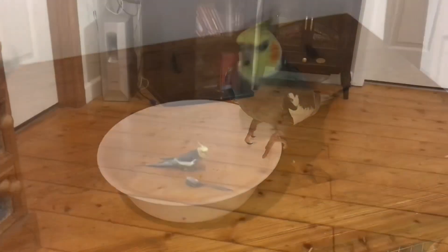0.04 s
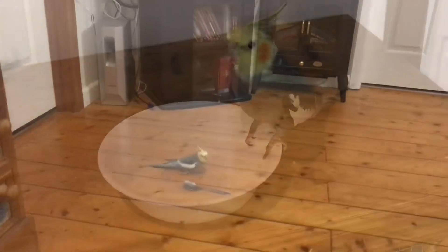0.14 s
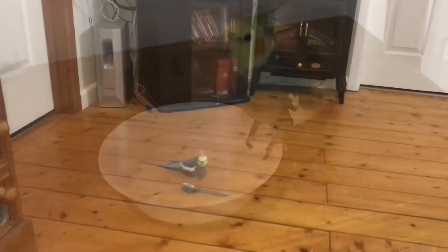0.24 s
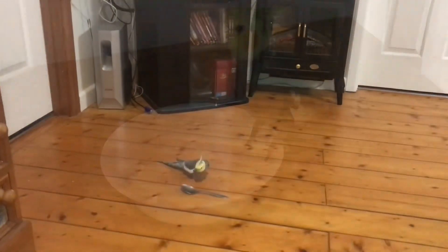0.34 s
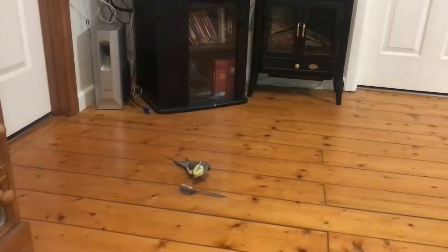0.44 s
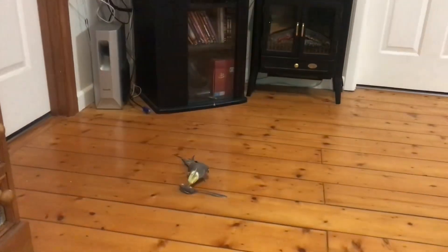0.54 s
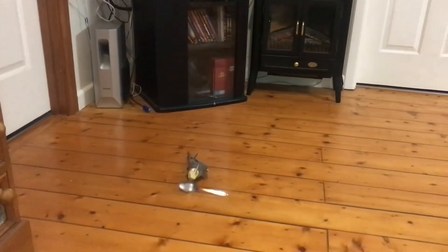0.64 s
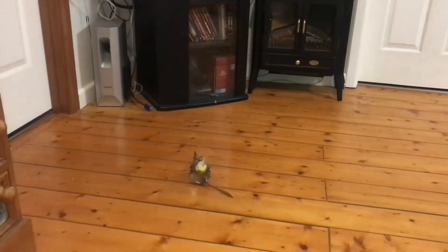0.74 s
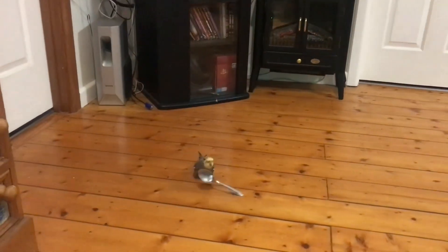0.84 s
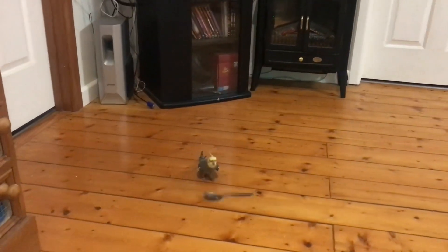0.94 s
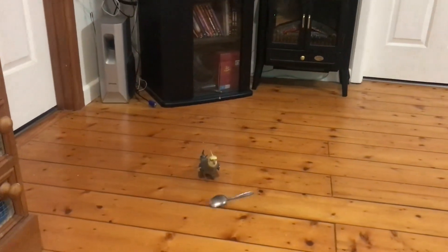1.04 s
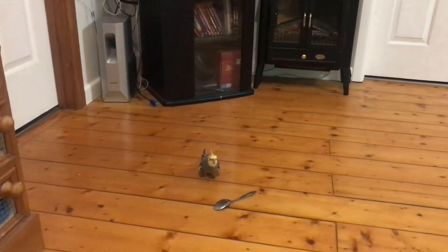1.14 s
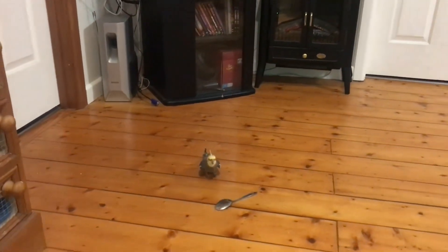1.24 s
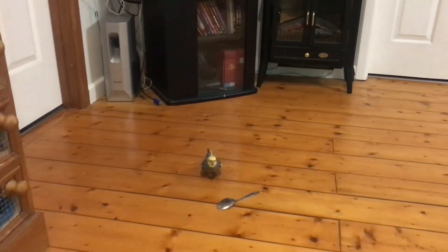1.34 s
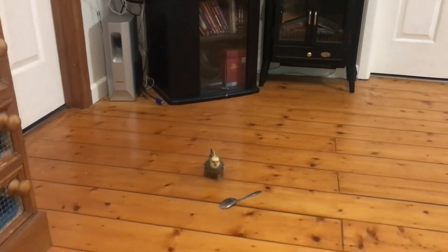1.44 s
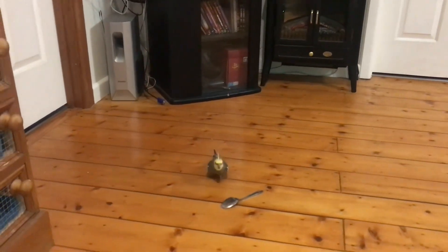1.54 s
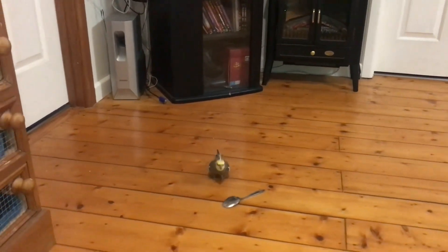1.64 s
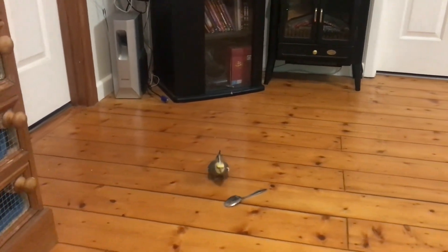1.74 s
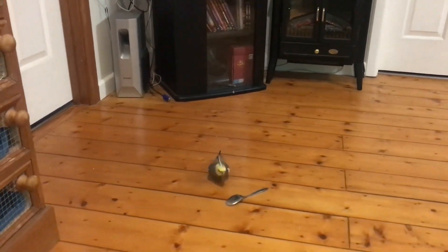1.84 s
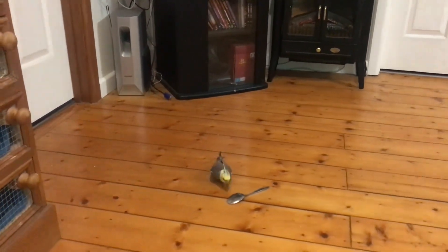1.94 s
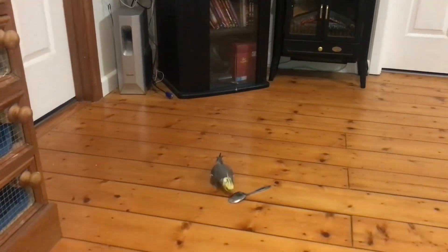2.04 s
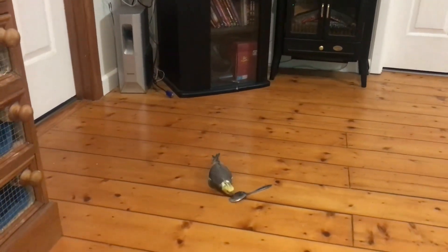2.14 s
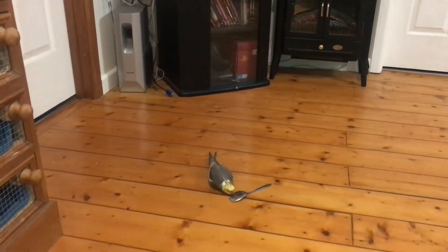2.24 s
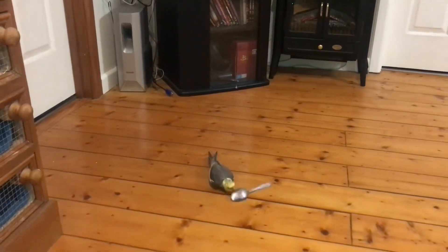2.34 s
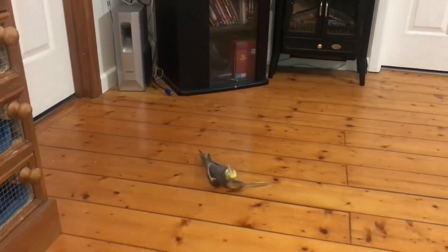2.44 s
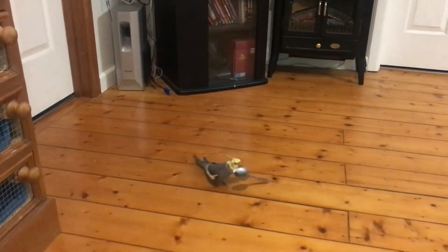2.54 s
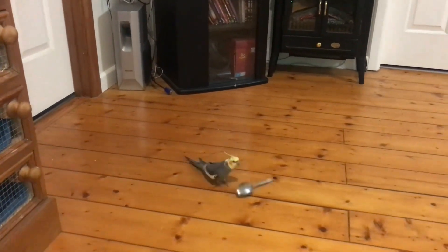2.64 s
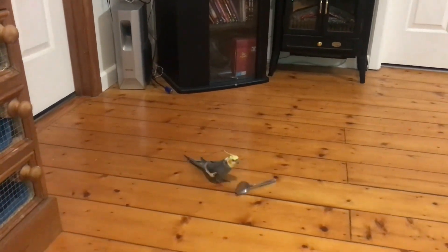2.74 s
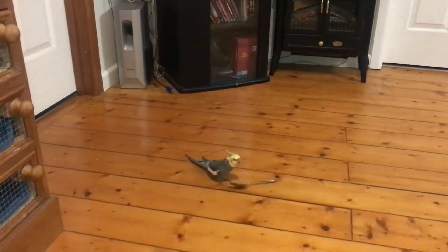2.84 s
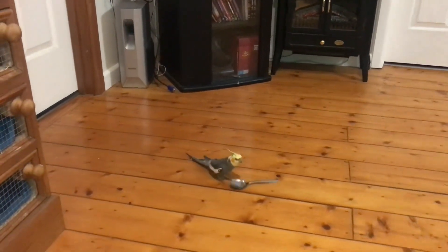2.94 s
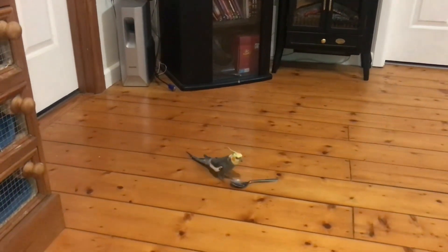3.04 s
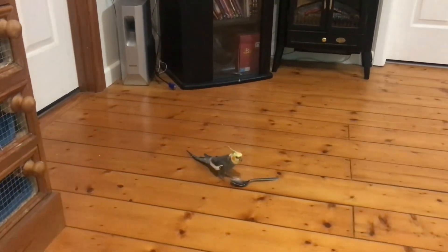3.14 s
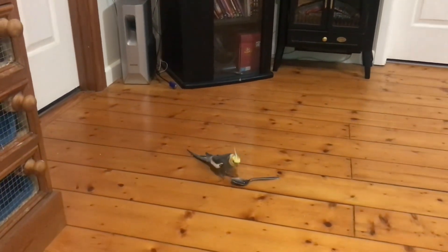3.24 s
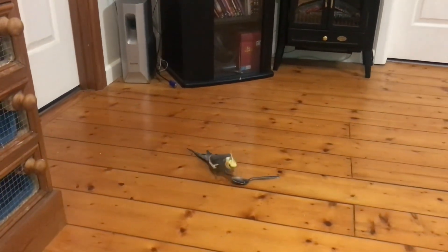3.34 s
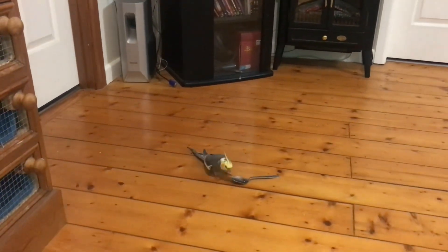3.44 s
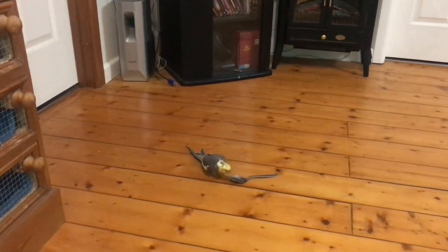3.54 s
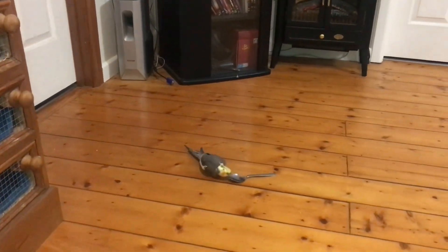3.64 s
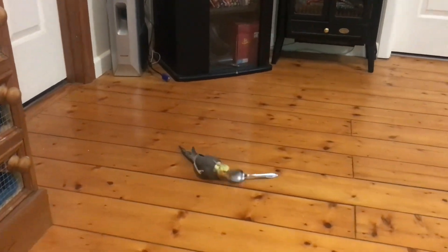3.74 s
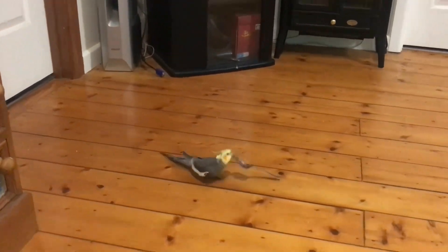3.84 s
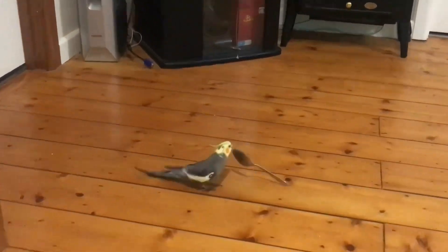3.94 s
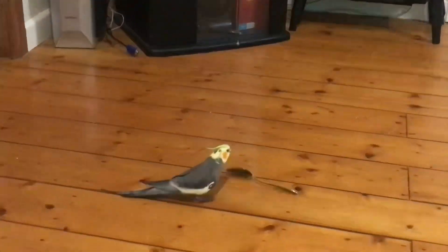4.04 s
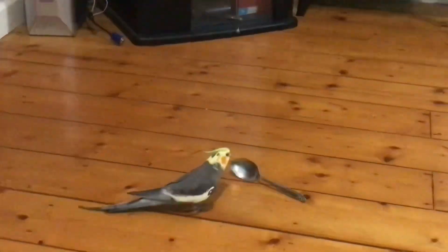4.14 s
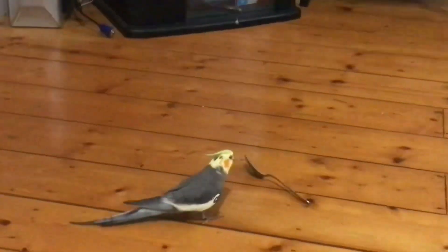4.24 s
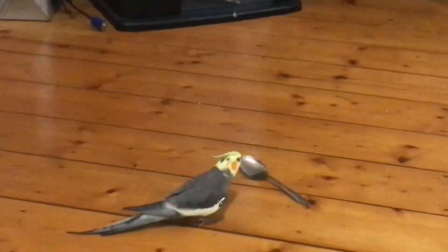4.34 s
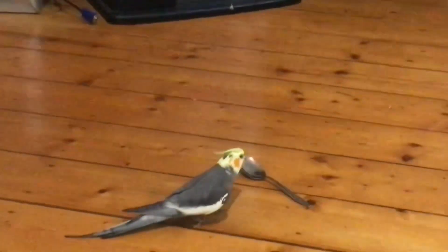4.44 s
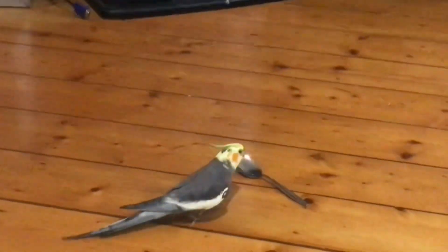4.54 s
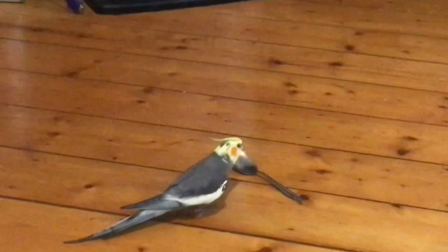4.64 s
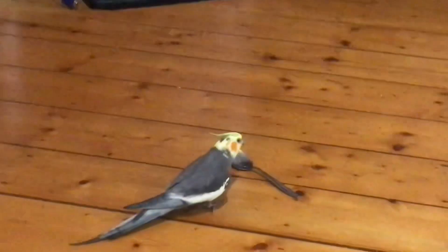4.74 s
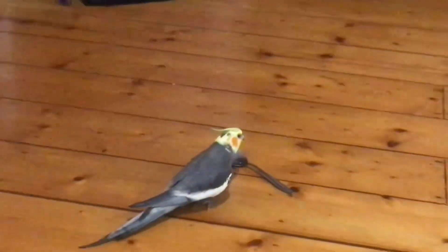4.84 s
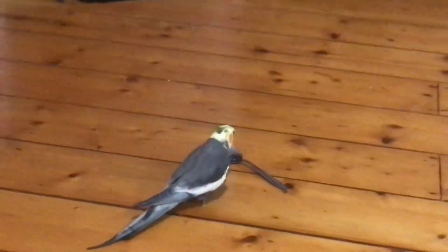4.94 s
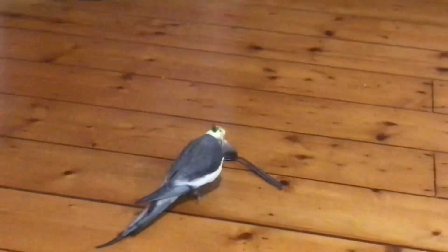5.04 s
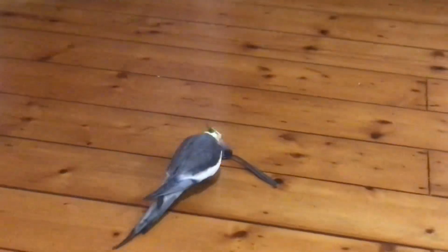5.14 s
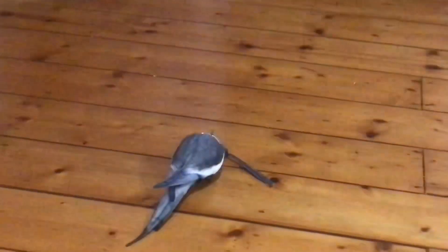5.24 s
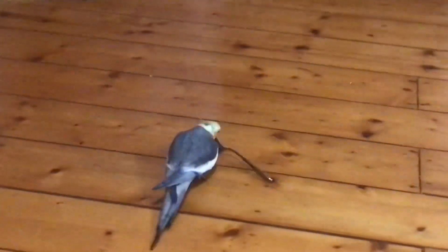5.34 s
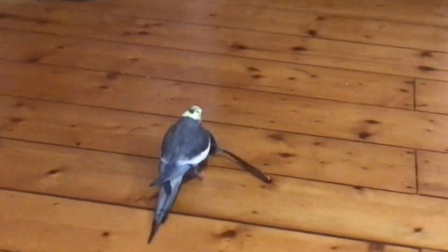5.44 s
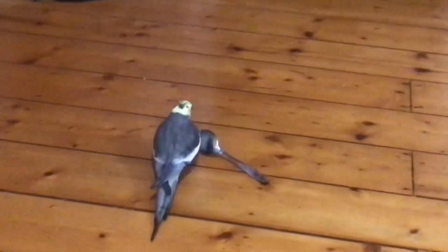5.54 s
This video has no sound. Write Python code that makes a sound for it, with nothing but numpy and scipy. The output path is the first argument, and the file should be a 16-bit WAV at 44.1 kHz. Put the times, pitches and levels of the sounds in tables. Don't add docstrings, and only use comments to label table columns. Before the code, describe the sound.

The tail of a bird whistle opens over faint room rumble. Light pecks lead to a loud spoon clatter on a wood floor, with hollow board thumps and rocking rattle, then a short nearly pure whistled tune. Two more tosses each get the same whistled reply, before small final taps. Live indoor echo, handheld phone a few steps off.

```python
import sys
import numpy as np
from scipy import signal
from scipy.io import wavfile
from scipy.ndimage import uniform_filter1d

SR = 44100
rng = np.random.default_rng(int(sys.argv[2]) if len(sys.argv) > 2 else 0)


def wav_record(signal):
    frames = np.transpose(np.atleast_2d(signal))
    bounded = np.clip(frames, -1, 1)
    quanta = np.round(bounded * 32767).astype(np.int16)
    wavfile.write(sys.argv[1], SR, quanta)


def boost(x):
    u = np.asarray(x, float) / 20
    return 10 ** u


N = 246959
LEAD = SR // 2

# pitch_hz, level_db
HUSH_COLOUR = [(12, -38.5), (20, -18.5), (34, 4.5), (58, 9.5), (81, 1), (123, -6), (142, -21.5), (182, -5),
               (367, -17), (802, -21.5), (1290, -26.5), (2260, -30.5), (2910, -33), (4180, -37),
               (16000, -44.5)]
# peak_s, over_calm_db, rise_s, fall_s
STIRS = [
    (1.17, 37.5, 0.12, 0.29),
    (2.2, 7.5, 0.81, 0.87),
    (2.9, 16.5, .16, 1),
    (4.268, 20.5, 0.47, 0.84),
    (5.46, 15.5, 0.39, 0.12),
]
# pitch_hz, t60_s (time to fade by 60 dB)
ROOM_FADE = [(100, 0.42), (400, 0.77), (1500, 0.74), (3000, 0.57), (6000, 0.55), (14000, 0.11)]
# delay_s, level_db
ECHOES = [(.0045, -11), (.0085, -5), (.012, -13.5), (.017, -9.5), (.022, -12), (.028, -7.5)]

# pitch_hz, level_db, t60_s
BOARD_BOOMS = [(67.76, -6, 0.35), (174.7, -3.5, 0.36), (234.7, -16, 0.37), (231, -20, 0.13),
               (302, -7.5, 0.6), (368.7, -18, 1), (440.2, -14.5, 0.2), (824, -13, 0.56), (940, -3.5, 0.3),
               (1020, 2, 0.12), (1120, -23, 0.053)]
# pitch_hz, level_db
WOOD_COLOUR = [(50, -44), (110, -16.5), (295, -3.5), (535, -11), (1030, -2.5), (2270, -14), (3400, -17),
               (5080, -31), (8640, -48.5), (16000, -71)]
BOWL_HZ = [2697, 4177, 5356, 6168, 7100, 8466, 8612, 9700, 10250, 11390, 12120, 12600, 13770, 14910]
# level_db, t60_s
BOWL_RING = [(-5, .2), (-14, .35), (-9, .65), (-13, .6), (-27, .27), (-11, .4), (-14, .3), (-12, .33),
             (-27, .35), (-22, .25), (-21, .3), (-21, .28), (-25, .3), (-26, .24)]
# start_s, blow_db, brightness_db_per_octave, bowl_ring_db, handle_ring_db
BOUNCES = [(0.996, -11.5, -0.1, -45, -33), (1.057, -34, 6, -35, -27), (1.102, -13, 3.5, -42.5, -19.5),
           (1.162, -17, 2.5, -33.5, -32), (1.219, -21, 3, -40, -35), (1.253, -29, 4.5, -23, -14.5),
           (1.273, -27, 6.5, -81.5, -10.5), (2.713, -13, 3, -27, -11), (2.733, -26, -7.2, -36, -10.5),
           (2.788, -21.5, -2.5, -53, -29), (2.85, -19.5, 1.2, -35.5, -23), (4.054, -9.5, -2, -52.5, -34),
           (4.095, -11.5, 1.5, -43, -7.7), (4.162, -25.5, -8, -56.5, -32)]
TOUCHES = [
    (2.974, -31, 1, -38, -2),
    (4.247, -29, 3, -42, -30),
    (4.288, -38, 0, -28, 8),
    (4.344, -36, 0, -45, -10),
    (4.383, -37, -1, -40, 2),
]
# start_s, blow_db, brightness_db_per_octave, boom_db
PECKS = [(0.623, -36.5, -4, -1), (0.668, -28, 0.5, -7), (0.691, -32.5, -7, 0), (1.55, -59.5, 2, -16.5),
         (1.596, -77, -20, -1), (1.75, -60, -7, -4.5), (2.117, -39.5, -5.5, -3), (2.364, -67, -15, -7.5),
         (2.387, -38.5, -3, -4), (3.654, -43.5, -4, 6), (3.676, -32.5, -3, -23), (5.252, -34, -0.7, -3.5),
         (5.299, -40, 5.5, -2.5), (5.43, -26, -7, -3.5)]
# start_s, length_s, level_db, fade_db, ring_db
ROCKING = [
    (0.709, 0.28, -53, -0.5, -42),
    (1.02, 0.034, -40, -27, -38),
    (1.082, 0.3, -30.5, -33.5, -32),
    (2.138, .18, -68, 3.5, -45.5),
    (2.34, 0.6, -56.5, -19, -39.5),
    (2.752, 0.38, -35.5, -1.5, -55.5),
    (4.165, 0.21, -40.5, 0, -27),
    (4.368, 0.25, -35.5, -11.5, -30.5),
    (5.266, 0.097, -52, -21, -34.5),
    (5.452, 0.077, -35, -39.5, -63),
]

# top_s, top_hz, rise_s, sag_hz_per_s, level_db
FALLS = [
    (-.22, 3744, .021, 26300, -31),
    (1.559, 3680, 0.023, 31230, -24.5),
    (3.203, 3644, .027, 25100, -27),
    (4.653, 3827, 0.024, 29500, -26),
]
FALL_SHAPE_DB = [-17.5, -6.5, 2.5, 7.9, 3.5, 6.1, -12]
SIGH_SHAPE_DB = [-12, -12, -21]
# top_s, top_hz, rise_s, fall_s, level_db
ARCHES = [
    (-.03, 1861, 0.04, 0.068, -34),
    (1.76, 1747, 0.086, 0.049, -32),
    (3.394, 1802, 0.075, .058, -31),
    (4.845, 1790, 0.054, 0.047, -32.5),
]
ARCH_SHAPE_DB = [-15.5, -9.5, -10.5, 1.3, -15.5, -20]
OVERTONES_DB = [-30.5, -37.5, -48.5, -50.5]
HALF_LINES_DB = [-5, -15, -33]
# start_s, level_db
CHIRPS = [
    (1.252, -32),
    (2.888, -34),
    (4.32, -38),
]
# time_s, pitch_hz, level_db
CHIRP_SHAPE = [(0, 4700, -9), (.013, 3500, -2), (.022, 3200, 0), (.031, 2800, -9)]
# start_s, length_s, pitch_hz, level_db
LEAD_INS = [
    (1.368, 0.041, 1487, -42),
    (3.027, 0.027, 1564, -37.5),
    (4.471, 0.037, 1540, -44),
]
SECOND_VOICE = [
    (3.183, 0.077, 6000, -51.5),
    (4.628, .052, 6000, -51),
]
# start_s, length_s, pitch_hz, level_db
SQUEAK = (1.745, .06, 12350, -75)
# warble_s, pitch_hz, rasp_db, warble_db
INTAKES = [
    (1.526, 3780, -48.5, -36),
    (3.168, 3844, -53.5, -37.5),
    (4.616, 4114, -44.5, -42.5),
]
# time_s, pitch_ratio, level_db
WARBLE_SHAPE = [(0, .94, -1), (.006, 1.2, 6.2), (.011, 0.56, -2.5), (.017, 1.1, -4.5), (.025, 1.2, -22)]


def evened(x):
    return x / np.sqrt(np.mean(x ** 2) + 1e-20)


def read(points, hz):
    f, value = np.transpose(points)
    return np.interp(np.log(hz + 1), np.log(f + 1), value)


def add(mix, s, sound):
    part = mix[LEAD + round(s * SR):][:len(sound)]
    part += sound[:len(part)]


def hush(hush_db=-54, calm_db=-67.5, usual_db=-66, low_hz=130, high_hz=900, rumble_swell_db=1.5):
    frames, hz = N // 512 + 6, np.fft.rfftfreq(2048, 1 / SR)[:, None]
    a, b = rng.standard_normal((frames, 1025, 2)).T
    swell = evened(uniform_filter1d(rng.standard_normal(frames), 12))
    middle = 1 / (1 + (low_hz / (hz + 1)) ** 4) / (1 + (hz / high_hz) ** 4)
    frame_s = np.arange(frames) * 512 / SR
    busy_db = calm_db - usual_db
    for s, db, rise, drop in STIRS:
        busy_db = busy_db + np.interp(frame_s, [s - rise, s, s + drop], [0, db, 0])
    z = (a + 1j * b) * boost(read(HUSH_COLOUR, hz) + rumble_swell_db * swell * (hz < 400))
    calm = signal.istft(z, nperseg=2048, noverlap=1536)[1][:N]
    busy = signal.istft(z * boost(middle * busy_db), nperseg=2048, noverlap=1536)[1][:N]
    return boost(hush_db) * busy / calm.std()


def room(x, wet_db, echo_db):
    taps = np.zeros(SR)
    at = np.arange(500, SR - 20, 20)
    taps[at + rng.integers(0, 20, len(at))] = rng.choice([-1., 1.], len(at))
    hz, t, z = signal.stft(taps, SR, nperseg=256)
    tail = signal.istft(z * boost(-60 * t / read(ROOM_FADE, hz)[:, None]), SR, nperseg=256)[1]
    tail *= np.clip((np.arange(len(tail)) - 400) / 900, 0, 1)
    tail *= boost(wet_db) / np.linalg.norm(tail)
    tail[0] = 1
    for k, (delay, db) in enumerate(ECHOES):
        tail[round(delay * SR)] += (-1) ** k * boost(db + echo_db)
    return signal.fftconvolve(x, tail)[LEAD:LEAD + N]


def causal(db):
    log_gain = np.log(boost(np.concatenate([db, db[-2:0:-1]])))
    pulse = np.fft.ifft(np.exp(np.conj(signal.hilbert(log_gain)))).real[:1024]
    return pulse / abs(pulse).max()


def ring(blows, hz, t60):
    r = 10 ** (-3 / (t60 * SR))
    turn = 2 * np.pi * hz / SR
    return signal.lfilter([np.sin(turn)], [1, -2 * r * np.cos(turn), r * r], blows)


def all_blows(boom_db=10.5, boom_per_blow_db=1.45, peck_ring_db=-54, peck_handle_db=-34.5):
    blows = []
    for s, db, bright_db, bowl_db, handle_db in [*BOUNCES, *TOUCHES]:
        blows.append((s, db, bright_db, bowl_db, boom_db + boom_per_blow_db * db, handle_db))
    for s, db, bright_db, low_db in PECKS:
        blows.append((s, db, bright_db, peck_ring_db, low_db, peck_handle_db))
    return sorted(blows)


def steel(hold, luck, bowl_db, handle_db, damped_db=-8, spread_db=-2.5, handle_hz=3340, handle_t60=0.4):
    t = np.arange(SR // 2) / SR
    db, t60 = np.transpose(BOWL_RING)[:, :, None]
    db = db + bowl_db + spread_db * np.clip(luck[:len(BOWL_RING), None], -1.5, 1.5)
    tones = (boost(db - 60 * t / t60) * np.sin(2 * np.pi * np.outer(BOWL_HZ, t))).sum(0)
    tones += boost(handle_db - 60 * t / handle_t60) * np.sin(2 * np.pi * handle_hz * t)
    return tones * boost(damped_db * np.clip((t - hold) / .004, 0, 1))


def rocking(per_s=260, spread_db=6.5, rock_db=-6.5, ring_db=3, ring_fade_db=-5):
    rock, jingle = np.zeros((2, N + LEAD))
    patter = boost(spread_db * np.minimum(rng.exponential(1, N), 2.6)) * rng.choice([-1, 1], N)
    patter *= rng.random(N) < per_s / SR
    for start, length, level_db, fade_db, sing_db in ROCKING:
        s = np.array([start, start + length])
        db = np.array([level_db, level_db + fade_db])
        metal_db = np.array([sing_db, sing_db + ring_fade_db])
        metal_db = metal_db + np.minimum(db + 55, 0)
        at = np.arange(round(start * SR), min(round(s[-1] * SR), N))
        taps = patter[at] * boost(np.interp(at / SR, s, db) + rock_db)
        add(rock, start, taps)
        add(jingle, start, taps * boost(np.interp(at / SR, s, metal_db) + ring_db))
    return rock, jingle


def spoon_and_floor(rock_boom_db=-14, ring_db=8, handle_db=-14, boom_db=-8, chatter_s=0.0065):
    wood, metal, boom = np.zeros((3, N + LEAD))
    hz = np.fft.rfftfreq(2048, 1 / SR)
    octaves = np.log2(np.minimum(hz, 7000) / 1000 + 0.19)
    blows = all_blows()
    holds = np.diff([row[0] for row in blows], append=N)
    chance = rng.standard_normal((len(blows), 1024))
    for (s, db, bright_db, metal_db, low_db, stem_db), hold, luck in zip(blows, holds, chance):
        chatter = luck * abs(luck) * np.exp(-np.arange(len(luck)) / (chatter_s * SR))
        chatter[0] = 2.6
        knock = np.convolve(chatter, causal(read(WOOD_COLOUR, hz) + bright_db * octaves))
        add(wood, s, boost(db) * knock / abs(knock).max())
        add(metal, s, boost(db) * steel(hold, luck, metal_db + ring_db, stem_db + handle_db))
        add(boom, s, boost([db + low_db + boom_db]))
    rock, jingle = rocking()
    wood += signal.oaconvolve(rock, causal(read(WOOD_COLOUR, hz)))[:len(wood)]
    for f, (db, t60) in zip(BOWL_HZ, BOWL_RING):
        metal += ring(boost(db) * jingle, f, t60 / 2)
    thumps = boom + boost(rock_boom_db) * rock
    boards = sum(boost(db) * ring(thumps, f, t60) for f, db, t60 in BOARD_BOOMS)
    return wood, metal, boards


def fall(top, hz, rise, sag, db, from_hz=3250, break_hz=2225, sag_bend=1.15):
    down = np.arange(5) / 4 * (hz - break_hz) / sag
    s = np.concatenate([[top - rise, top - rise / 2], top + down])
    sagging = hz - (hz - break_hz) * (down / down[-1]) ** sag_bend
    pitch = np.concatenate([[from_hz, hz - (hz - from_hz) / 4], sagging])
    return np.transpose([s, pitch, db + np.array(FALL_SHAPE_DB)])


def sigh(top, hz, rise, sag, db, break_hz=2225, end_hz=1652, length_s=0.021):
    steps = np.arange(3) / 2
    start = top + (hz - break_hz) / sag
    pitch = break_hz + (end_hz - break_hz) * steps
    return np.transpose([start + length_s * steps, pitch, db + np.array(SIGH_SHAPE_DB)])


def arch(top, hz, rise, drop, db, from_hz=1170, to_hz=994, hold_s=0.045):
    held = top + hold_s
    s = [top - rise, top - rise / 2, top, held, held + drop / 2, held + drop]
    pitch = [from_hz, (from_hz + hz) / 2, hz, hz, (to_hz + hz) / 2, to_hz]
    return np.transpose([s, pitch, db + np.array(ARCH_SHAPE_DB)])


def note(start, length, hz, db, scoop=0.064, ends_db=2):
    return [(start, hz * (1 - scoop), db + ends_db), (start + length / 2, hz, db),
            (start + length, hz, db + ends_db)]


def rasp(s, hz, rasp_db, warble_db, length_s=0.034, scoop=0.13, start_db=-19):
    return [(s - length_s, hz * (1 - scoop), rasp_db + start_db), (s - length_s / 2, hz, rasp_db), (s, hz, rasp_db)]


def warble(s, hz, rasp_db, warble_db):
    return np.multiply(WARBLE_SHAPE, [1, hz, 1]) + [s, 0, warble_db]


def whistle(rows, rough, grain_s, overtone_db, half_db, closing_db=55.0):
    s, hz, db = np.transpose(rows)
    t = np.arange(s[0], s[-1], 1 / SR)
    hz = uniform_filter1d(np.interp(t, s, hz), min(300, len(t) // 8), mode="nearest")
    turns = np.cumsum(hz) / SR
    tone = np.sin(2 * np.pi * turns)
    husk = evened(signal.oaconvolve(rng.standard_normal(SR // 3)[:len(t)], np.hanning(90), "same"))
    open_db = overtone_db + closing_db * np.log2(hz / hz.max())
    for k, d in enumerate(OVERTONES_DB, 2):
        partial = boost(d + open_db) * (0.83 + .3 * husk) * np.sin(2 * np.pi * k * turns)
        tone += partial * (k * hz < SR / 2)
    for k, d in enumerate(HALF_LINES_DB):
        tone += boost(d + half_db) * np.sin(np.pi * (2 * k + 1) * turns)
    breath = rng.standard_normal(SR // 4)[:len(t)]
    chop = evened(signal.oaconvolve(breath, np.hanning(round(grain_s * SR)), "same"))
    tone *= 1 - rough + rough * chop
    return s[0], np.sqrt(2) * boost(np.interp(t, s, db)) * tone * signal.windows.tukey(len(t), .15)


def bird(*kinds):
    song = np.zeros(N + LEAD)
    for notes, *voice in kinds:
        for rows in notes:
            add(song, *whistle(rows, *voice))
    return song


def scene():
    wood, metal, boards = spoon_and_floor()
    spoon = room(wood, -4.5, -0.67) + room(metal, 1, -0.003) + boards[LEAD:]
    falls = [fall(*row) for row in FALLS]
    wisps = [sigh(*row) for row in FALLS] + [note(*row) for row in [*SECOND_VOICE, SQUEAK]]
    arches = [arch(*row) for row in ARCHES]
    peeps = [np.add(CHIRP_SHAPE, [s, 0, db]) for s, db in CHIRPS] + [note(*row) for row in LEAD_INS]
    rasps = [rasp(*row) for row in INTAKES]
    warbles = [warble(*row) for row in INTAKES]
    high = bird((falls, .08, .006, 6, -30), (wisps, .7, .004, -9, -60))
    low = bird((arches, .38, .012, -10, -40), (peeps, .65, .007, -6, -30))
    scratch = bird((rasps, .8, .0025, 8, -6), (warbles, .15, .003, 9, -3))
    song = room(high, -10.0, -6.5) + room(low, -6.5, 0.32) + room(scratch, -13, -1.5)
    return (spoon + song + hush())[None]


def low_pass(x):
    return signal.sosfilt(signal.butter(12, 16480, fs=SR, output="sos"), x)


def record(dry):
    dry = signal.sosfilt(signal.butter(4, 44, "high", fs=SR, output="sos"), dry)
    dry = signal.oaconvolve(dry, signal.firwin(255, 15800, fs=SR)[None], "same")
    return low_pass(dry)


dry = scene()
out = record(dry)
wav_record(out)
```